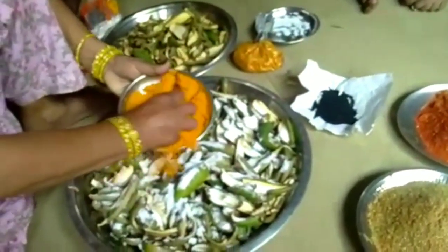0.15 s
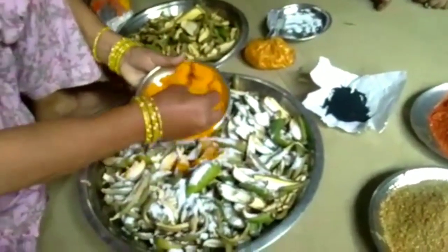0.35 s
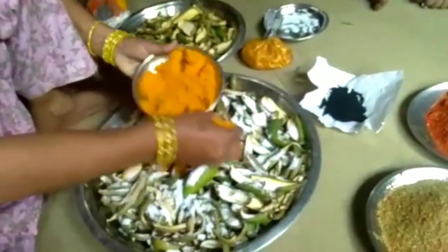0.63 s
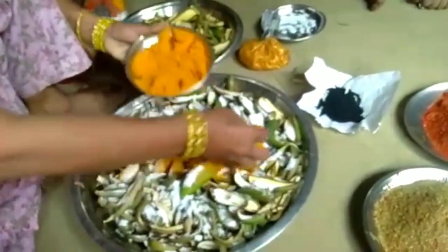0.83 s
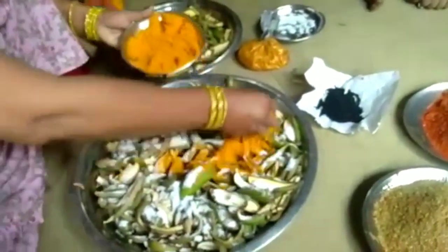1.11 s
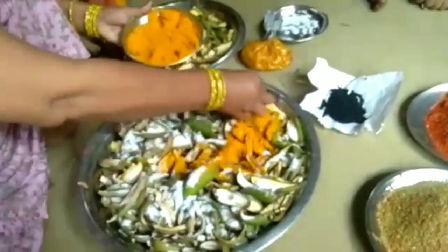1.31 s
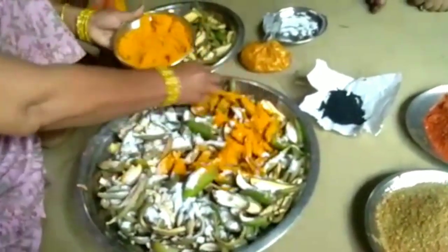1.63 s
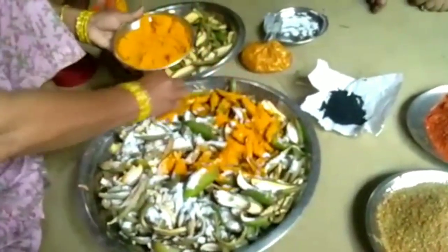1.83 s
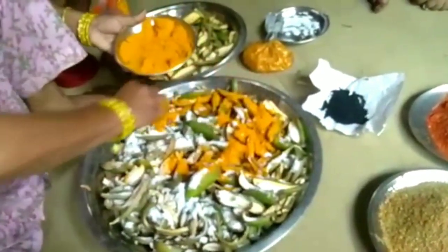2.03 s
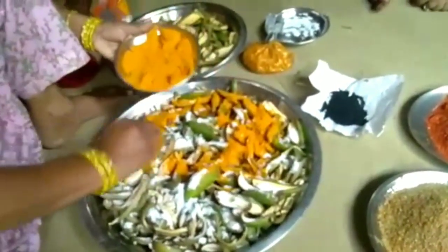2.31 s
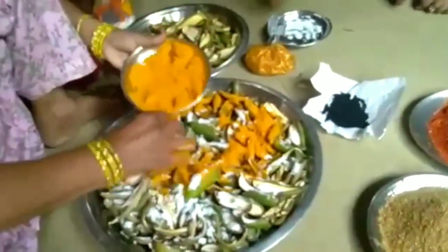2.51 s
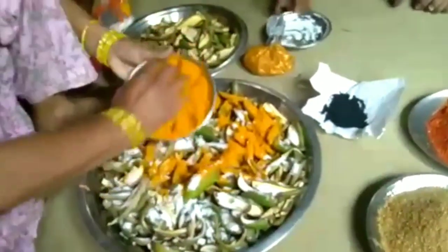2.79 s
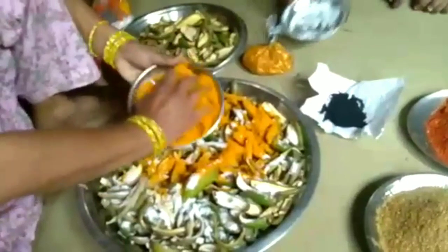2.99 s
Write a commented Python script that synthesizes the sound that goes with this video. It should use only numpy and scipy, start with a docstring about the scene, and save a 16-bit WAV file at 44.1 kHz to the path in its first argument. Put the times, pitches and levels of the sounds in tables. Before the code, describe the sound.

Powder scrapes and clicks as fingers scoop spice from a steel bowl and scatter it

```python
"""Close by in a small hard room, one microphone: fingers take spice from a steel bowl and rub it over cut fruit.
Over a low rumble of shaped noise, powder scrapes from the start: friction noise hisses and rubs ringing steel.
Bangles and bowl soon click (noise bursts into steel and room), and bangles jingle in the first second.
A swelling brush of the plate follows after one second; later the hand grows sparse, then clicks hardest.
The sound then drops out completely as the hand returns to the bowl; a few clicks and scrapes end it."""
import sys
import numpy as np
from scipy import signal
from scipy.fft import rfft, irfft, next_fast_len
from scipy.io import wavfile
from scipy.ndimage import map_coordinates

SR = 44100
rng = np.random.default_rng(int(sys.argv[2]) if len(sys.argv) > 2 else 0)


def log_audio(samples):
    """Write samples as a 16-bit WAV file to the path given in sys.argv[1]."""
    # one column per channel
    frames = np.atleast_2d(samples).T
    # limit to full scale, then quantise
    limited = np.clip(frames, -1, 1)
    pcm = np.round(limited * 32767).astype(np.int16)
    wavfile.write(sys.argv[1], SR, pcm)


N = 138915


def amp(db):
    """Amplitude factor of a level in dB."""
    return 10 ** (np.asarray(db) / 20)


def unit(x):
    """Scales a sound to rms 1."""
    return x / np.sqrt(np.mean(x ** 2) + 1e-20)


def level(x):
    """Scales a short sound to the energy of rms 1 over 10 ms."""
    return x / np.linalg.norm(x) * np.sqrt(SR / 100)


def along(points, hz):
    """Interpolates (f/Hz, value) points on a log frequency axis."""
    f, v = np.transpose(points)
    return np.interp(np.log(hz + 1), np.log(f + 1), v)


def filtered(x, response):
    """x times a complex response of frequency."""
    m = 2 * next_fast_len(len(x))
    spectrum = rfft(x, m) * response(np.fft.rfftfreq(m, 1 / SR))
    return irfft(spectrum, m)[:len(x)]


def colour(x, points):
    """Causal filter through (f/Hz, level/dB) points."""
    def response(hz):
        # folding the cepstrum makes the filter minimum phase
        cepstrum = irfft(np.log(amp(along(points, hz))))
        half = len(cepstrum) // 2
        cepstrum[1:half] *= 2
        cepstrum[half + 1:] = 0
        return np.exp(rfft(cepstrum))
    return filtered(x, response)


def resonate(x, modes):
    """Sum of resonances (f/Hz, width/Hz, level/dB)."""
    def response(f):
        return sum(amp(db) * 1j * f * width / (centre * centre - f * f + 1j * f * width)
                   for centre, width, db in modes)
    return filtered(x, response)


def noise():
    """White noise as long as the scene."""
    return rng.standard_normal(N)


# how long the small hard room holds each frequency: f/Hz, t60/s
ROOM_DECAY = [(200, 0.71), (2000, 0.35), (4000, 0.27), (16000, 0.26)]


def room(x):
    """A fresh diffuse tail; each frequency dies at its own speed."""
    hz, t, z = signal.stft(rng.standard_normal(SR // 2), SR, nperseg=256)
    decay = amp(-60 * t / along(ROOM_DECAY, hz)[:, None])
    tail = signal.istft(z * decay, SR, nperseg=256)[1]
    return signal.fftconvolve(x, tail / np.linalg.norm(tail))[:len(x)]


GRAINS_PER_S, GRAIN_SPREAD_DB, GRAIN_DB = 900, 3.5, -2  # GRAIN_DB: all slips against the smooth rub


def friction(size=N):
    """Tiny slips of uneven size over a smooth rub."""
    rub, strength, side = rng.standard_normal((3, size))
    happens = rng.random(size) < GRAINS_PER_S / SR
    slips = happens * amp(GRAIN_SPREAD_DB * np.clip(strength, -2, 2)) * np.sign(side)
    return rub + amp(GRAIN_DB) * unit(slips)


MODE_SCATTER_DB = 8.5  # how unevenly each touch or grip drives the resonances
# ringing modes of the steel bowl: f/Hz, width/Hz, level/dB before the scatter
STEEL_MODES = [(2997, 190, -6.5), (3636, 120, 1), (3922, 176, 4.5), (4191, 160, 1.5)]
# what the steel radiates: f/Hz, level/dB
STEEL_RADIATION = [(500, -19), (2000, -4), (4400, 0), (12000, -9.5)]


def steel(x):
    """The bowl's ring; each touch favours other modes."""
    modes = [(hz, width, db + MODE_SCATTER_DB * rng.standard_normal()) for hz, width, db in STEEL_MODES]
    return colour(resonate(x, modes), STEEL_RADIATION)


# spectrum of a dry crack: f/Hz, level/dB
CRACK_SPECTRUM = [(200, -17.5), (1500, -15.5), (3000, -8), (5200, 2), (8500, 4.5), (11500, 2), (15300, 0),
                  (16300, -18)]


def crack(x):
    """The bright colour shared by clicks and crumbs."""
    return colour(x, CRACK_SPECTRUM)


STROKE_ATTACK_S, STROKE_RELEASE_S = 0.0009, 0.035  # linear rise, t60 after the rub stops
FLUTTER_DB, FLUTTER_PER_S = 1, 91  # random level steps of a rub, joined by straight lines
WALLS_MS, WALLS_DB = 4.1, -5  # decay constant and level of the echoes between bowl, plate and floor
STROKE_WET_DB = -4  # room against direct sound, for strokes and ticks


def stroke(length, swell_db, voice):
    """One rub: uneven slips that swell, stop, and die away in the near echoes and the room."""
    t = np.arange(SR // 2) / SR
    swell = swell_db * (np.minimum(t / length, 1) - .5)
    release = -60 * np.maximum(t - length, 0) / STROKE_RELEASE_S
    envelope = np.minimum(t / STROKE_ATTACK_S, 1) * amp(swell + release)
    steps = rng.standard_normal(len(t))
    flutter = amp(FLUTTER_DB * map_coordinates(steps, [t * FLUTTER_PER_S], order=1))
    echoes = rng.standard_normal(len(t)) * np.exp(-1000 * t / WALLS_MS)
    x = voice(len(t))
    near = signal.fftconvolve(x, echoes / np.linalg.norm(echoes))[:len(t)]
    x = envelope * flutter * (x + amp(WALLS_DB) * near)
    return x + amp(STROKE_WET_DB) * room(x)


FLOOR_DB = -62.5  # overall rms
# spectrum of the room's low rumble: f/Hz, level/dB
FLOOR_SPECTRUM = [(25, -27), (60, -7.5), (105, -5), (140, -14), (220, -20.5), (2500, -30.5), (5000, -37),
                  (16000, -46.5)]


def room_floor():
    """Steady noise, heaviest in the bass, under everything."""
    return amp(FLOOR_DB) * unit(colour(noise(), FLOOR_SPECTRUM))


BUMP_BASE_HZ, BUMP_WIDTH_S = 67.4, 0.015  # pitch before its random factor; time from peak to 1/e
# soft bumps of the handled bowl: t/s, level/dB
BOWL_BUMPS = [(0.434, -50), (0.566, -41), (1.327, -48), (2.492, -49), (2.978, -49.5), (3.06, -49)]


def bumps():
    """A few slow cycles for each nudge of the bowl."""
    t = np.arange(N) / SR
    out = np.zeros(N)
    for s, db in BOWL_BUMPS:
        hz = BUMP_BASE_HZ * rng.uniform(0.71, 1.63)
        cycles = np.sin(2 * np.pi * (hz * (t - s) + rng.random()))
        out += amp(db) * np.exp(-((t - s) / BUMP_WIDTH_S) ** 2) * cycles
    return out


# the hand brushes the fruit and the plate: t/s of the peak, level/dB, rise/s and fall/s over 60 dB
PLATE_BRUSHES = [(0.283, -64, 0.14, 0.12), (0.765, -58, 0.14, 0.65), (1.188, -33.5, 0.019, 0.036),
                 (1.212, -48, 0.29, 0.19), (2.752, -48, .06, 0.074)]
# resonances of the loaded plate: f/Hz, width/Hz, level/dB
PLATE_MODES = [(488, 71, -6.5), (833, 47, -12), (1390, 31.4, -11), (1670, 150, -10.5), (2150, 64, -18),
               (2200, 10, -5), (2735, 32, -6)]


def brushes():
    """Swelling strokes through the resonances of the loaded plate."""
    t = np.arange(N) / SR
    envelope = sum(amp(db - 60 * np.maximum((s - t) / rise, (t - s) / fall))
                   for s, db, rise, fall in PLATE_BRUSHES)
    return envelope * unit(resonate(friction(), PLATE_MODES))


SING_WIDTH_AT_1KHZ_HZ, SING_RELEASE_S = 110, .1  # width of each of two passes; t60
# brief rubs that make one resonance of the metal sing: t/s, length/s, f/Hz, level/dB
METAL_SINGS = [(0.092, 0.017, 3945, -54.5), (0.14, 0.026, 3970, -51), (0.266, 0.019, 907, -55.5),
               (0.287, 0.09, 2874, -56.5), (0.487, 0.012, 4100, -56), (1.117, 0.1, 1390, -51),
               (1.132, 0.06, 1605, -55.5), (1.256, 0.057, 2850, -60), (1.266, 0.11, 4230, -59.5),
               (1.385, 0.083, 2180, -61.5), (1.427, 0.0062, 720, -55), (1.453, 0.0071, 1710, -51),
               (1.453, 0.006, 2560, -52), (1.492, 0.012, 1740, -52), (1.64, 0.07, 2180, -64),
               (2.111, 0.046, 2190, -61.5), (2.267, 0.002, 3630, -50), (2.722, 0.025, 1900, -48.5),
               (2.918, 0.0083, 1367, -53.5), (2.989, 0.04, 6750, -53.5), (3.019, 0.0076, 1333, -55.5),
               (3.022, 0.03, 2820, -54), (3.024, 0.03, 3140, -54)]


def sings():
    """A rub feeds one narrow resonance, which then dies away."""
    out, t = np.zeros(N), np.arange(N) / SR
    for s, length, hz, db in METAL_SINGS:
        mode = [(hz, SING_WIDTH_AT_1KHZ_HZ * np.sqrt(hz / 1000), 0)]
        release = amp(-60 * np.maximum(t - s - length, 0) / SING_RELEASE_S)
        envelope = np.clip((t - s) / 0.0014, 0, 1) * release
        tone = unit(resonate(resonate(noise(), mode), mode))
        out += amp(db) * envelope * tone
    return out + amp(-5.0) * room(out)


# the bangles shiver against each other: t/s, length/s, level/dB before echoes and room
BANGLE_JINGLES = [(0.736, 0.013, -56.5), (0.753, 0.05, -43.5), (0.825, 0.074, -53)]
# ringing modes of the bangles: f/Hz, width/Hz, level/dB
BANGLE_MODES = [(3260, 120, 4), (4310, 120, 7), (5240, 120, -4), (5550, 160, 11), (5680, 200, -4),
                (6250, 130, -8)]


def jingles():
    """Bangles slide together as the arm swings out: friction through their ringing modes."""
    def voice(n):
        return unit(resonate(friction(n), BANGLE_MODES))
    out = np.zeros(N + SR)
    for s, length, db in BANGLE_JINGLES:
        out[round(s * SR):][:SR // 2] += amp(db) * stroke(length, 0, voice)
    return out[:N]


TICK_RISE_S, TICK_T60_S = 0.00052, .014
# crumbs crushed and dropped, and soft clicks too light to ring the steel: t/s, direct level/dB
DRY_TICKS = [(0.109, -67), (0.227, -51.5), (0.526, -65), (0.691, -52), (0.932, -42), (0.951, -43.5),
             (1.011, -46), (1.152, -42.5), (1.297, -53), (1.329, -60), (1.366, -64.5), (1.378, -56),
             (1.570, -51), (1.695, -50.5), (2.7078, -50.5), (3.01, -46), (3.013, -53.5)]


def ticks():
    """A crumb breaks or a light click lands in a tiny burst of slips."""
    out, t = np.zeros(N + SR), np.arange(SR // 2) / SR
    shape = (1 - np.exp(-t / TICK_RISE_S)) * amp(-60 * t / TICK_T60_S)
    for s, db in DRY_TICKS:
        tick = amp(db) * level(crack(shape * friction(len(t))))
        out[round(s * SR):][:len(t)] += tick + amp(STROKE_WET_DB) * room(tick)
    return out[:N]


SNAP_S, CONTACT_S = 0.0016, 0.001102  # t60 of the snap, its lag behind the listed time
SCUFF_S, SCUFF_RISE_S = 0.018, 0.00042  # t60 and rise constant of the scuff
# level of the first spike at a listed crack of 0 dB, and its dB per dB of crack: harder hits are sharper
SPIKE_DB, SPIKE_GROWS = 8.5, 0.52
REBOUND_S, REBOUND_WIDTH_S, REBOUND_DB = 0.0022, .0009, -8.5  # the plate's return: delay, smear, level
CRACK_DB, RING_DB, BODY_DB, CLICK_WET_DB = -23.5, -6.5, -5, -4.5  # trims added to the table; room level
# sharp clicks of bangles and bowl: t/s, crack level/dB, steel ring level/dB, low body level/dB
# (all three before trims), level/dB of the scuff against the snap
METAL_CLICKS = [(0.268, -17, -44, -54.5, -9), (0.3149, -16, -40, -67, 4), (0.3242, -24, -37, -49, -6),
                (0.3582, -18.5, -41, -51, -15), (0.4646, -40.5, -47.5, -61, 15),
                (0.5403, -14.5, -31.5, -44, 0), (0.6556, -23, -37, -54, -7),
                (0.7637, -25, -28.5, -41.5, -29), (0.907, -18.5, -35.5, -52, -2),
                (0.9757, -10.5, -34, -40, -15.5), (1.1854, -11, -28.5, -37, -2),
                (1.1891, -13.5, -31, -41, -15), (1.4285, -9, -38.5, -39.5, -7.5),
                (1.4491, -21, -31.5, -42, -13), (1.493, -14.5, -32, -53, -27), (1.714, -20.5, -40, -49, 0),
                (1.7396, -13, -34.5, -48, -10), (1.7473, -19, -40, -52, -9), (1.936, -25, -41.5, -53.5, 6),
                (2.27, -38, -49.5, -79, -13), (2.6496, -19.5, -49.5, -54.5, -4.5),
                (2.7272, -9.5, -28, -44, -10.5), (2.7431, -6.5, -40, -34, -14.5),
                (2.7596, -3, -35, -36, -17), (2.9294, -12, -35.5, -51, -4.5), (2.9928, -22.5, -40, -67, -9),
                (3.0232, -18, -34, -54.5, -6)]
# spectrum of the low body: f/Hz, level/dB
BODY_SPECTRUM = [(230, -8.5), (450, -1.5), (900, -5.5), (1800, 0), (3000, 7.5), (6000, -29.5)]


def clicks():
    """Each contact is a snap and a short scuff; it rings the steel, comes back off the plate and fills the room."""
    out, t = np.zeros(N + SR), np.arange(SR // 2) / SR
    for s, crack_db, ring_db, body_db, scuff_db in METAL_CLICKS:
        snap = amp(-60 * t / SNAP_S)
        scuff = amp(scuff_db - 60 * t / SCUFF_S) * (1 - np.exp(-t / SCUFF_RISE_S))
        spike = amp(SPIKE_DB + SPIKE_GROWS * crack_db) * (t == 0)
        blow = (snap + scuff) * rng.standard_normal(len(t)) + spike
        rebound = rng.standard_normal(len(t)) * np.exp(-((t - REBOUND_S) / REBOUND_WIDTH_S) ** 2)
        returned = signal.fftconvolve(blow, rebound / np.linalg.norm(rebound))[:len(t)]
        blow = blow + amp(REBOUND_DB) * returned
        hit = amp(crack_db + CRACK_DB) * level(crack(blow))
        hit += amp(ring_db + RING_DB) * level(steel(blow))
        hit += amp(body_db + BODY_DB) * level(colour(blow, BODY_SPECTRUM))
        out[round((s + CONTACT_S) * SR):][:len(t)] += hit + amp(CLICK_WET_DB) * room(hit)
    return out[:N]


SQUEAK_WIDTH_HZ, SQUEAK_DB = 71, -4  # narrow resonances that change with each grip
# spectrum of the powder's hiss: f/Hz, level/dB
GRIT_SPECTRUM = [(200, -14), (900, -13), (2000, -8), (5000, -31), (6200, -6.5), (7400, -1), (10500, -2),
                 (15100, -1.5), (16200, -22.5)]


def grit(x, air_db, count=26):
    """Hiss of the powder with the narrow resonances of one grip."""
    modes = [(rng.uniform(2000, 15000), SQUEAK_WIDTH_HZ, MODE_SCATTER_DB * rng.standard_normal())
             for _ in range(count)]
    spectrum = [(hz, db + air_db * (hz > 10000)) for hz, db in GRIT_SPECTRUM]
    return colour(unit(x) + amp(SQUEAK_DB) * unit(resonate(x, modes)), spectrum)


HISS_DB, RUB_DB = -3.5, -5.5  # trims added to the table
# finger strokes through the powder: t/s, length/s, gritty hiss level/dB, rubbed steel level/dB
# (both before trims, echoes and room), swell/dB from start to end
POWDER_STROKES = [(0.0, 0.083, -53, -53.5, -10.5), (0.141, 0.056, -52, -64, -4),
                  (0.233, 0.029, -58.5, -64, 0), (0.278, 0.025, -37.5, -36.5, 0.5),
                  (0.299, 0.069, -47, -47.5, 2), (0.497, 0.054, -63.5, -58, 18), (0.552, 0.06, -56, -79, 1),
                  (0.673, 0.052, -59.5, -59, -1), (0.742, 0.057, -52.5, -50, -11),
                  (0.828, 0.075, -57.5, -48.5, -2), (0.908, 0.08, -46.5, -51.5, -10.5),
                  (0.977, 0.068, -45.5, -43, 0), (1.042, 0.13, -41.5, -43.5, 7),
                  (1.198, 0.062, -44.5, -42, 4.5), (1.429, 0.048, -46.5, -42.5, 5),
                  (1.638, 0.019, -53, -50, 10), (1.665, 0.06, -44.5, -58.5, 11.5),
                  (1.737, 0.015, -39, -40.5, 4), (1.897, 0.013, -43, -58.5, -8),
                  (1.92, 0.019, -47.5, -48.5, 7), (1.986, 0.022, -55.5, -63, -4),
                  (2.027, 0.018, -53, -58.5, -2), (2.054, 0.057, -53.5, -65.5, 16),
                  (2.108, 0.022, -49, -46.5, 2), (2.24, 0.022, -64, -64.5, 22.5),
                  (2.643, 0.15, -60.5, -56.5, -8.5), (2.909, 0.011, -41, -42, -4.5),
                  (3.028, 0.073, -55.5, -52, -10), (3.076, 0.071, -52, -60, 17)]
# how the hiss's top octave shifts: t/s, level/dB
AIR_LEVELS = [(0.6, -5), (1.7, 3.5), (2.25, -1.5), (2.65, 2)]


def powder():
    """Powder hisses between the fingers and grinds on the steel."""
    out = np.zeros(N + SR)
    for s, length, hiss_db, rub_db, swell_db in POWDER_STROKES:
        air_db = np.interp(s, *np.transpose(AIR_LEVELS))

        def voice(n):
            hiss = amp(HISS_DB + hiss_db) * unit(grit(friction(n), air_db))
            rub = amp(RUB_DB + rub_db) * unit(steel(friction(n)))
            return hiss + rub
        out[round(s * SR):][:SR // 2] += stroke(length, swell_db, voice)
    return out[:N]


def scene():
    """All hand sounds over the room's floor."""
    background = room_floor() + bumps() + brushes() + sings()
    hands = jingles() + ticks() + clicks() + powder()
    return (background + hands)[None]


DROPOUT_START_S, DROPOUT_END_S = 2.770, 2.909
TOP_HZ = 16600  # nothing passes above; the treble fades out over the last 700 Hz


def record(dry):
    """A short dropout and the band limit."""
    t = np.arange(N) / SR
    live = (t < DROPOUT_START_S) | (t > DROPOUT_END_S)
    return filtered(dry[0] * live, lambda hz: np.clip((TOP_HZ - hz) / 700, 0, 1))[None]


dry = scene()
out = record(dry)
log_audio(out)
```